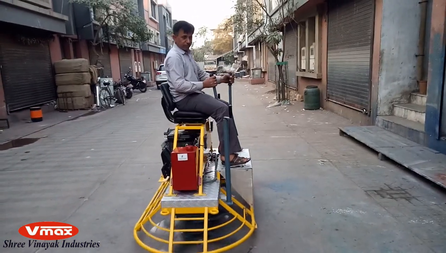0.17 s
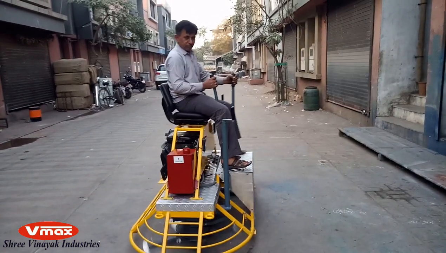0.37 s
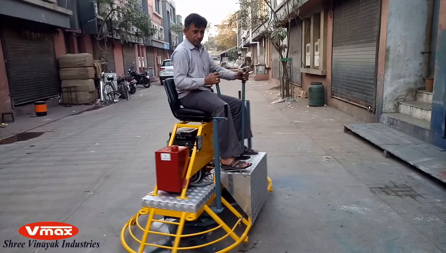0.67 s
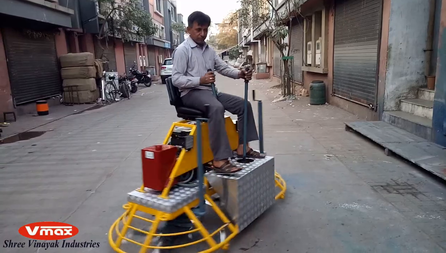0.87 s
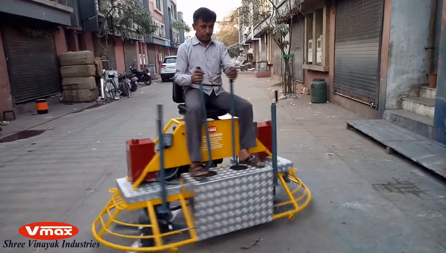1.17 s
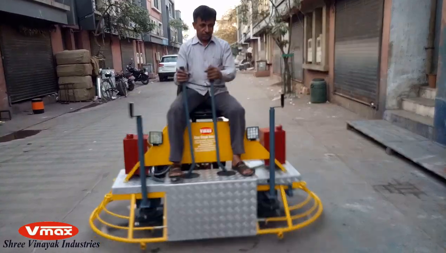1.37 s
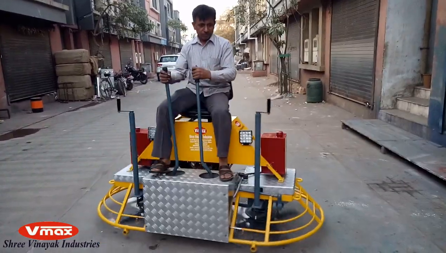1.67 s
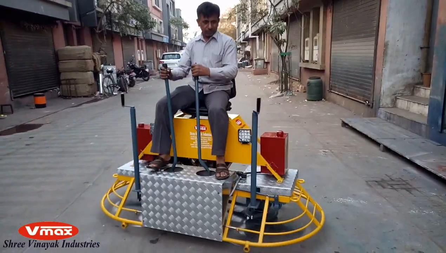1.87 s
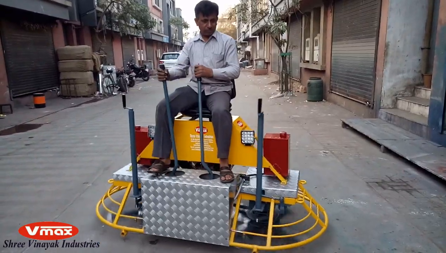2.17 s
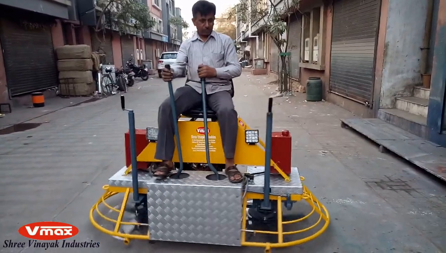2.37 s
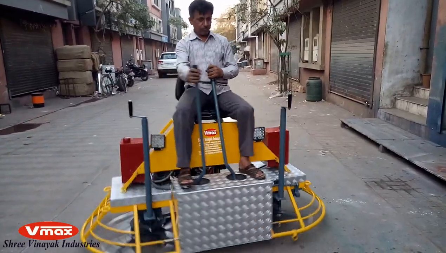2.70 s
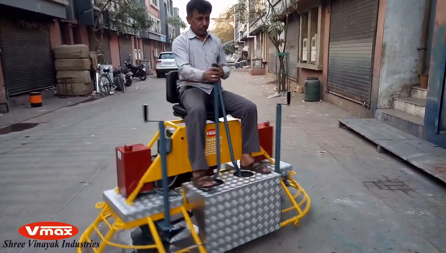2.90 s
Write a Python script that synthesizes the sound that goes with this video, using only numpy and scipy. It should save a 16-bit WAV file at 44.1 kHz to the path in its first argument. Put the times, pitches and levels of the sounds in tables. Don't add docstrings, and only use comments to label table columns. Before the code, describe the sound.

Harsh, dense grinding of rotating steel blades on pavement over a low, throbbing engine, close by.

```python
import sys
import numpy as np
from scipy import signal
from scipy.io import wavfile

SR = 44100
rng = np.random.default_rng(int(sys.argv[2]) if len(sys.argv) > 2 else 0)


def master(y):
    cut = np.clip(np.atleast_2d(y).T, -1, 1)
    pcm = np.round(cut * 32767)
    wavfile.write(sys.argv[1], SR, pcm.astype(np.int16))


def decibels_to_gain(level_db):
    exponent = np.asarray(level_db, float) / 20
    return 10 ** exponent


N = 134064
TIME = np.arange(N) / SR

# (frequency [Hz], likeness [share])
PORT_LIKENESS = [(70, .8), (200, .85), (330, .65), (600, .75), (950, .4), (2600, .5), (4500, .15),
                 (7000, 0)]


def rms_one(x):
    return x / np.sqrt(np.mean(x ** 2) + 1e-20)


def in_time(rows):
    s, *columns = np.transpose(rows)
    return [np.interp(TIME, s, column) for column in columns]


def at_hz(points, hz):
    table_hz, values = np.array(points).T
    return np.interp(np.log(hz), np.log(table_hz), values)


def drift(rate):
    r = np.exp(-80 * np.pi * rate / SR)
    white = rng.standard_normal(N // 40 + 2002)
    slow = signal.lfilter([1], [1, -2 * r, r * r], white)[2000:]
    return np.interp(np.arange(N) / 40, np.arange(len(slow)), rms_one(slow))


def resonance(x, hz, width_hz):
    r = np.exp(-np.pi * width_hz / SR)
    top = np.array([1, 0, -1]) * (1 - r * r) / 2
    return signal.lfilter(top, [1, -2 * r * np.cos(2 * np.pi * hz / SR), r * r], x)


def filtered(design, x):
    return signal.sosfilt(design, x)


def two_port_noise():
    return rng.standard_normal((2, 2, N))


def banded(white, spectrum, low_hz, high_hz, count, patchy_db, tilt_db=0):
    out = 0
    edges = np.geomspace(low_hz, high_hz, count + 1)
    for k, (low, high) in enumerate(zip(edges, edges[1:])):
        band = signal.butter(2, [low, high], "band", fs=SR, output="sos")
        near, far = filtered(band, white[k % 2])
        hz = np.sqrt(low * high)
        alike = np.clip(at_hz(PORT_LIKENESS, hz), 0, 1)
        bright = np.exp(-(np.log2(hz / 4900) / 0.34) ** 2)
        gain = decibels_to_gain(at_hz(spectrum, hz) + patchy_db * drift(11) + tilt_db * bright)
        right = alike * near + np.sqrt(1 - alike ** 2) * far
        out = out + gain * np.array([near, right])
    return rms_one(out)


def wind():
    band = signal.butter(2, [12, 43.7], "band", fs=SR, output="sos")
    lumps = filtered(band, rng.standard_normal((2, N)))
    level_db = -43.5 - 5 * TIME + np.array([[0], [-11]])
    return rms_one(lumps) * decibels_to_gain(level_db)


def residue(effort_db):
    # (frequency [Hz], level [dB per Hz])
    hiss_colour = [(6500, 7), (8000, -13.5), (10000, -15), (13300, -21), (13900, -21), (14300, -6),
                   (15000, -4.5), (15800, -9.5)]
    noise = banded(two_port_noise(), hiss_colour, 7020, 15900, count=26, patchy_db=2.4)
    port_db = np.array([[0], [-1]])
    return decibels_to_gain(-49.5 + 0.75 * effort_db + port_db) * noise


def crank():
    # (time [s], cycle rate [Hz])
    speed = [(0.0, 16.4), (0.41, 16.4), (0.51, 16.6), (1.04, 16.6), (1.24, 16.3), (1.49, 16.7),
             (1.69, 16.7), (1.94, 16.2), (2.05, 15.8), (2.29, 14.6), (2.53, 15.2), (2.82, 17.1),
             (2.96, 17.7), (3.04, 17.6)]
    hz, = in_time(speed)
    first_firing = 0.02
    return hz, first_firing + np.cumsum(hz) / SR


def roar(turn, bark_db):
    # (frequency [Hz], level [dB per Hz])
    roar_colour = [(25, -14), (55, -16), (90, -3.5), (190, -5), (330, -5), (650, -5.5), (950, -13),
                   (2500, -11.5)]
    noise = banded(two_port_noise(), roar_colour, 31.6, 2980, count=16, patchy_db=1.56)
    whine_hz, whine_width_hz = 541, 28
    whine = resonance(rng.standard_normal(N), whine_hz, whine_width_hz)
    whine = rms_one(resonance(whine, whine_hz, whine_width_hz))
    follow_db = 0.61 * (bark_db - bark_db.mean())
    throb_db = 1.06 * np.cos(2 * np.pi * turn)
    return decibels_to_gain(-39.5 + follow_db + throb_db) * noise + decibels_to_gain(-51) * whine


def exhaust(hz, turn):
    # (time [s], fifth order [dB], sixth order [dB], orders 7-8 [dB],
    # orders 9-11 [dB], orders 12-16 [dB])
    heading = [(0.0, -32, -34, -48, -42, -40.5), (0.09, -35, -41, -38.5, -37, -39),
               (0.13, -32.5, -36, -41, -43, -35.5), (0.31, -39, -33, -43, -43, -35),
               (0.77, -36, -45, -37.5, -37.5, -50), (0.82, -41, -60, -52.5, -39, -47.5),
               (0.91, -38, -47, -52, -46, -39.5), (0.96, -39.5, -72, -54, -41.5, -46),
               (1.28, -41, -33, -49, -46.5, -35), (1.52, -38.5, -59, -33, -36.5, -41),
               (1.58, -38.5, -47, -52, -45, -41.5), (1.77, -42, -40.5, -34, -39.5, -38),
               (2.07, -54, -37, -51.5, -35, -53), (2.18, -37, -41.5, -41, -44, -45.5),
               (2.29, -40, -47, -36.5, -47.5, -34), (2.86, -41.5, -39.5, -42.5, -34, -38.5),
               (2.97, -50, -38, -66, -43, -33.5), (3.04, -34, -32, -43, -36.5, -42)]
    order_column = [(3, 0), (5, 0), (6, 1), (7, 2), (8, 2), (9, 3), (10, 3), (11, 3), (12, 4), (13, 4),
                    (14, 4), (15, 4), (16, 4)]
    order_db = [-17, -1, -1.5, -7, -4.5, -8.5, -2, -1.5, -5, -.5, -5.5, -1.5, -2]
    thud_late, pipe_cut_hz = 0.13, 220
    groups_db = in_time(heading)
    out = 0
    for (k, column), db in zip(order_column, order_db):
        loose = k > 6
        height = decibels_to_gain(groups_db[column] + db + loose * 1.1 * drift(2.7))
        height = height / np.sqrt(1 + np.minimum((k * hz / pipe_cut_hz) ** 30, 12))
        phase = k * (turn - thud_late) + loose * rng.random()
        out = out + height * np.cos(2 * np.pi * phase)
    bark_db = (groups_db[3] + groups_db[4]) / 2
    return decibels_to_gain(-3.5) * out, bark_db


def catches():
    # (time [s], peak level [dB], colour [Hz])
    rough_patches = [(0.2783, -28, 3050), (0.3756, -6, 2920), (0.4629, -17, 2950), (0.6943, -4, 3000),
                     (0.78, -20, 3240), (0.849, -7, 4770), (0.9759, -5, 2860), (1.0984, -13, 3100),
                     (1.283, -12, 4060), (1.4445, -9, 3070), (1.504, -13, 2770), (1.563, -5.5, 3100),
                     (1.6805, -8, 3180), (1.9241, -29, 2760), (1.967, -9, 2940), (2.0264, -19.5, 2920),
                     (2.1042, -3.5, 4650), (2.2463, -11, 2930), (2.3525, -21, 2780), (2.408, -17, 3300),
                     (2.58, -5, 3200), (2.611, -8, 3100), (2.7936, -42, 3230), (2.9477, -4.5, 2930)]
    size = int(0.1 * SR)
    t = np.arange(size) / SR
    shape = np.exp(-(t / 0.0085) ** 2) * np.minimum(t / 0.0015, 1)
    out = np.zeros((2, N + SR))
    for s, db, hz in rough_patches:
        burst = rms_one(resonance(rng.standard_normal((2, size)), hz, width_hz=1530))
        start = int(s * SR)
        out[:, start:start + size] += decibels_to_gain(db - 27) * shape * burst
    return out[:, :N]


def blades(turn):
    # (time [s], pressure as level [dB], brightness [dB])
    pressure = [(0.0, -20, -6.5), (0.36, -18, -7), (0.89, -21.5, -5.5), (0.96, -20, -4.5), (1.04, -20, -7),
                (1.16, -18, -5.5), (1.23, -20.5, -6.5), (1.64, -19.5, -7.5), (1.72, -19.5, -6.5),
                (2.24, -18.5, -7), (2.32, -18.5, -5.5), (2.4, -19, -7), (2.51, -19.5, -6.5),
                (3.04, -18, -7)]
    # (frequency [Hz], level [dB per Hz])
    grind_colour = [(700, -8.5), (1200, -2.5), (2200, -9.5), (3000, 2.5), (4500, 3.5), (5800, 0.74),
                    (7000, -9)]
    # (time [s], depth [dB])
    blade_lifts = [
        (0.511, -5),
        (.835, -2),
        (0.969, -7.5),
        (1.556, -7.5),
        (1.65, -3.5),
        (1.915, -4),
        (2.093, -3.5),
        (2.985, -7.5),
    ]
    grains_per_s, lift_s = 9000, 0.0073
    level_db, bright_db = in_time(pressure)
    sizes = decibels_to_gain(2 * np.minimum(rng.exponential(1, (2, 2, N)), 5))
    sizes = sizes * rng.choice([-1, 1], (2, 2, N))
    grit = sizes * (rng.random((2, 2, N)) < grains_per_s / SR)
    firing_db = 0.5 * np.cos(3 * 2 * np.pi * (turn - 0.19))
    chatter_db = 1.39 * (0.3 * drift(32) + 0.88 * drift(73))
    level_db = level_db + firing_db + chatter_db
    for s, db in blade_lifts:
        level_db = level_db + db * np.exp(-((TIME - s) / lift_s) ** 2)
    tilt_db = 4.2 * (bright_db - bright_db.mean())
    noise = banded(grit, grind_colour, 587, 8200, count=12, patchy_db=1.08, tilt_db=tilt_db)
    return decibels_to_gain(-16.5 + level_db) * noise, level_db - level_db.mean()


def ports(x):
    # (frequency [Hz], width [Hz], height over flat [dB])
    left_peaks = [
        (2930, 820, 14),
        (4340, 1145, 10.5),
    ]
    left = x[0]
    for hz, width_hz, db in left_peaks:
        left = left + (decibels_to_gain(db) - 1) * resonance(x[0], hz, width_hz)
    left = decibels_to_gain(12) * filtered(signal.butter(4, 5200, fs=SR, output="sos"), left)
    ceiling = 0.93
    left = ceiling * np.tanh(left / ceiling)
    lag = 44
    right = np.interp(np.arange(N) - lag, np.arange(N), x[1])
    return filtered(signal.cheby1(8, 0.5, 6800, fs=SR, output="sos"), [left, right])


def scene():
    hz, turn = crank()
    grind, effort_db = blades(turn)
    tones, bark_db = exhaust(hz, turn)
    machine = tones + roar(turn, bark_db) + grind + catches()
    return ports(machine) + residue(effort_db) + wind()


def roll_off(x):
    return signal.sosfilt(signal.butter(12, 15560, fs=SR, output="sos"), x)


def record(dry):
    return roll_off(dry)


dry = scene()
out = record(dry)
master(out)
```